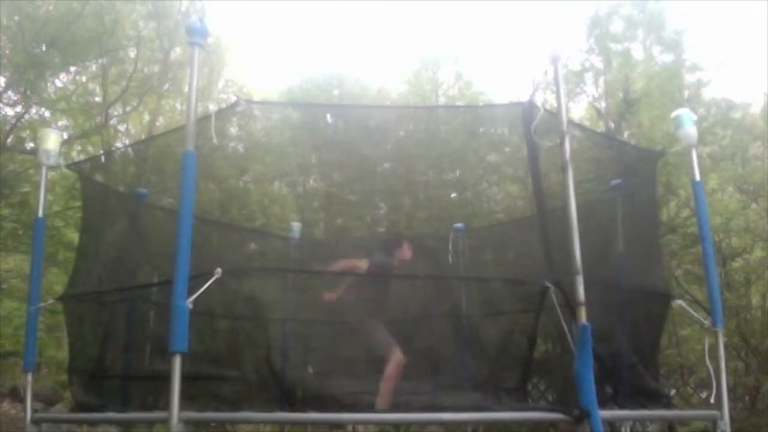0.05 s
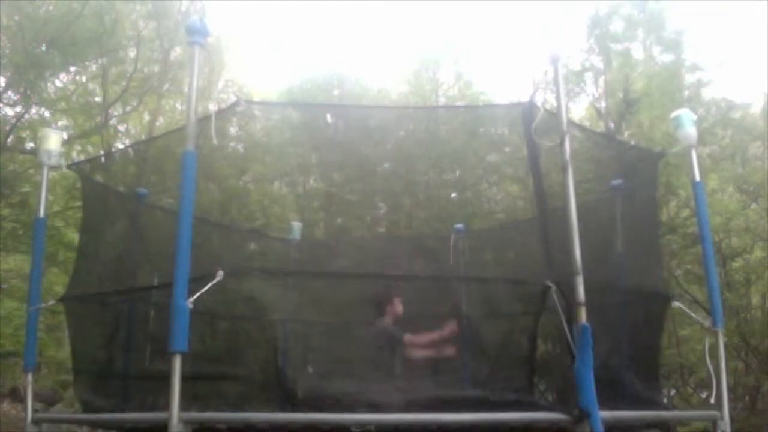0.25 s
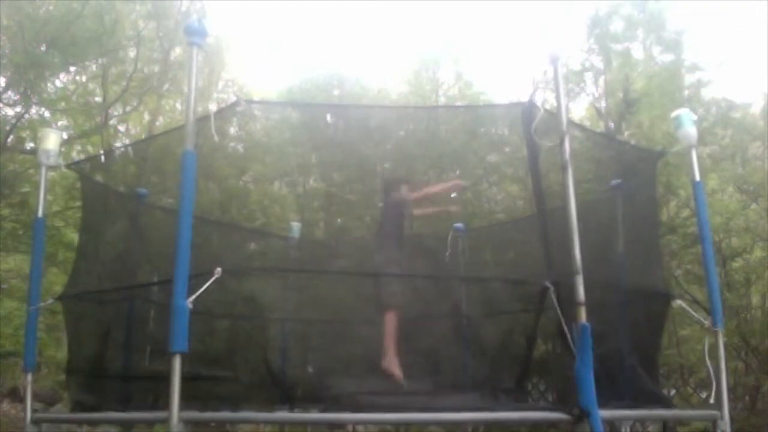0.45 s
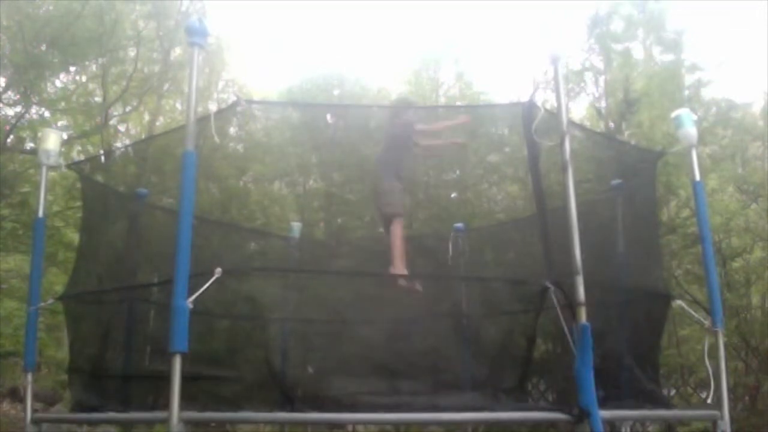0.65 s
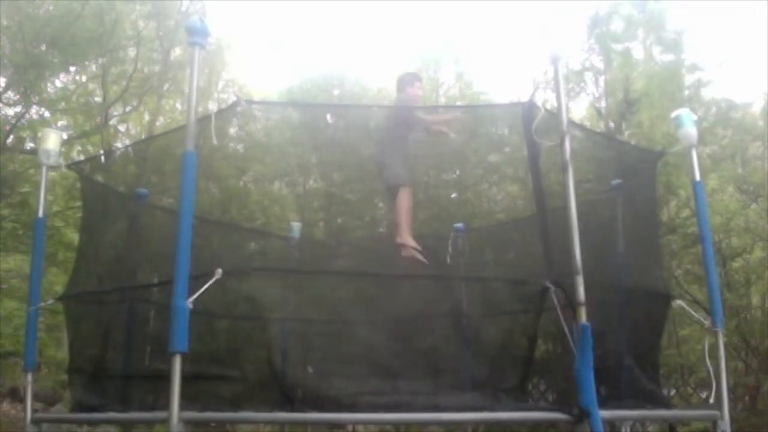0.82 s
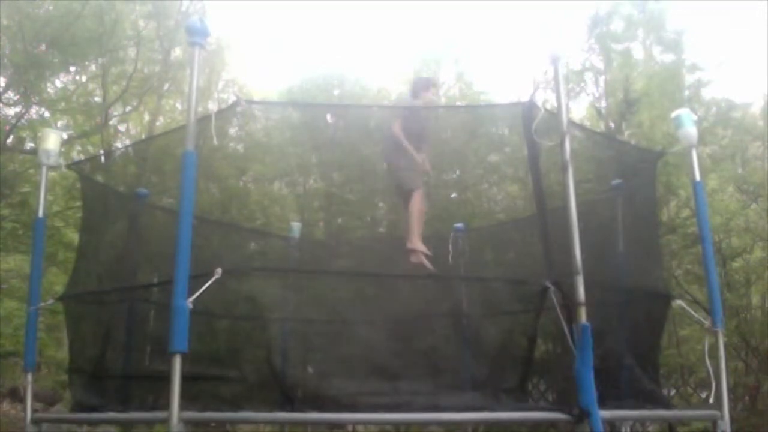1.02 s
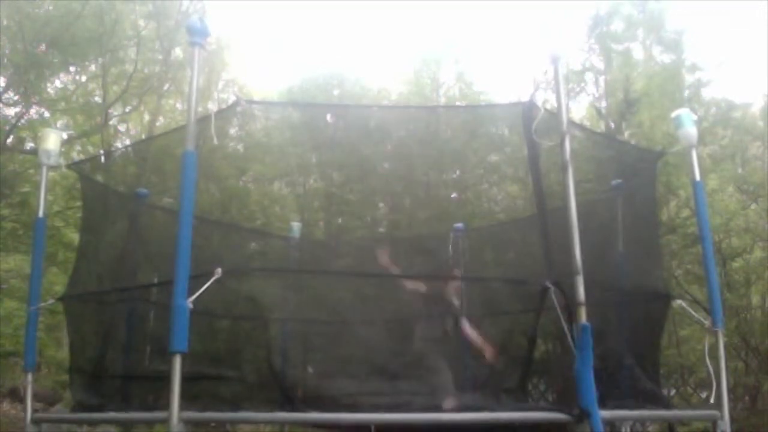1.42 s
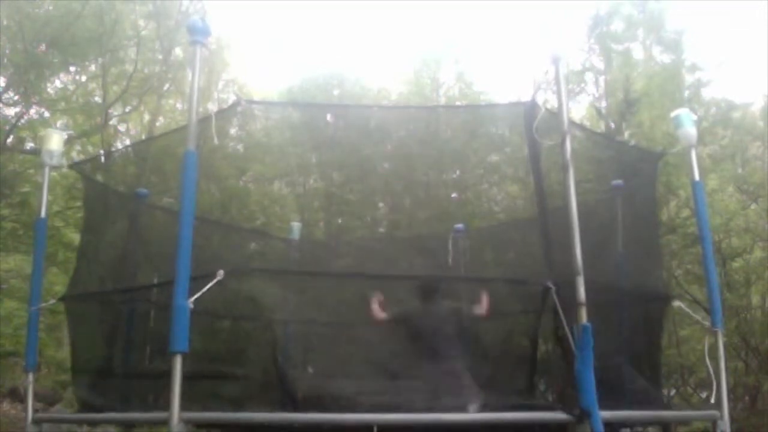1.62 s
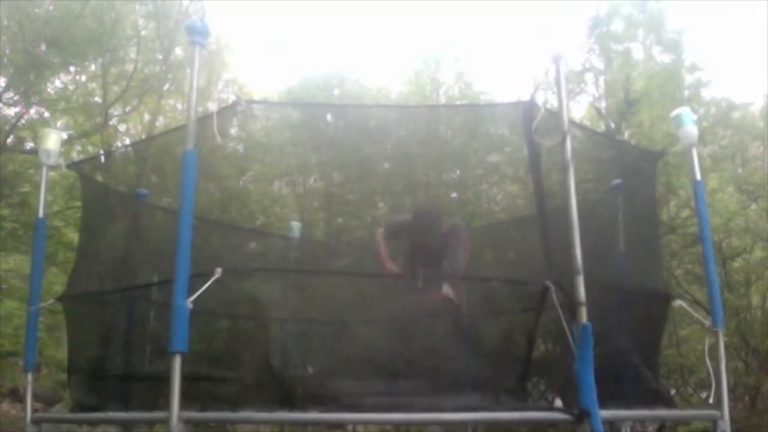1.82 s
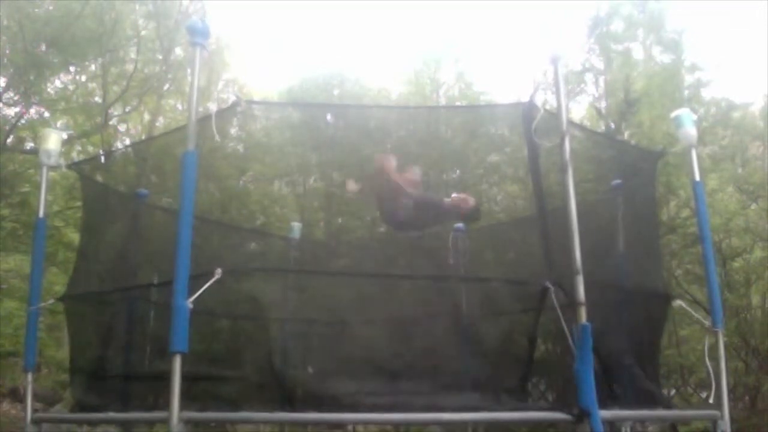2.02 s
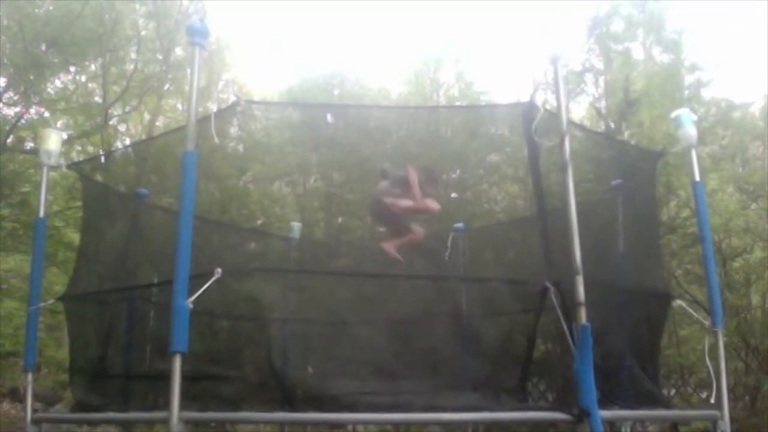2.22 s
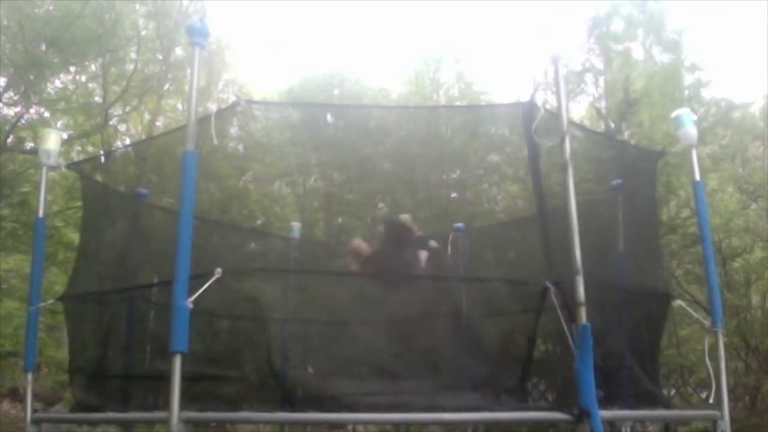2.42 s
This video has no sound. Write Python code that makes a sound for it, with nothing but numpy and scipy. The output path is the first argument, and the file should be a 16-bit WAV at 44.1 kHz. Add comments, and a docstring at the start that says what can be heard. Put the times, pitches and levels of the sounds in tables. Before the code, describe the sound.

A trampoline bounced on twice, its steel springs creaking over soft thumps and faint birdsong.

```python
"""A garden trampoline, one microphone some metres away; a person bounces twice.
A bird calls faintly over the hush as the first landing thumps the mat and stretches the steel springs,
whose hooks creak, squeak and clack in the frame. Springs and frame ring on during the flight, and the
bird calls again. The second landing comes at 1.5 s; a last rattle and a soft thump follow at 2.1 s."""
import sys
import numpy as np
from scipy import signal
from scipy.fft import rfft, irfft
from scipy.io import wavfile
from scipy.ndimage import uniform_filter1d

SR = 44100
rng = np.random.default_rng(int(sys.argv[2]) if len(sys.argv) > 2 else 0)


def int16_out(signal):
    """Quantize to a 16-bit WAV file."""
    q = np.round(np.clip(np.atleast_2d(signal).T, -1, 1) * 32767)
    wavfile.write(sys.argv[1], SR, q.astype(np.int16))


N = 112454
T = np.arange(N) / SR

# ringing modes of the steel: pitch_hz, level_db
STEEL_MODES = [(1918, 1), (1992, -5), (2235, 0), (2340, -7), (2420, -4), (2654, -5), (2842, -4), (2935, -3),
               (3090, -3), (3305, -1), (3630, -8), (3830, -9), (3930, -7), (4015, -8), (4285, -6),
               (4900, -9), (5640, -7), (7680, -12), (8405, -9), (8488, -9)]
HOOK_COLOUR_DB = 3  # random spread of the hooks' spectra


def spring_creaks():
    """As the springs stretch and recoil, each surge of load sets another group of hooks creaking."""
    # surges of load: peak_s, level_db, rise_s, fall_s, treble_db
    surges = [(.194, -45.5, .001, 0.03, -14), (.247, -33.5, 0.02, 0.045, -7.5),
              (.291, -33.5, 0.025, 0.021, -7.5), (.32, -35, 0.006696, 0.017, -8),
              (.342, -39.5, 0.0088, 0.029, -8), (.381, -36.5, 0.0055, 0.024, -11),
              (.404, -36.5, 0.012, 0.02, -10.5), (0.447, -46, 0.035, 0.022, 0),
              (1.537, -37, 0.01534, 0.022, -10), (1.572, -34, 0.015, 0.019, -6.5),
              (1.629, -36.5, 0.018, 0.026, -5.5), (1.714, -35.5, 0.03, 0.043, -5),
              (1.812, -36, 0.0085, 0.0088, -6.5), (1.822, -36, 0.003, 0.017, -7.5)]
    # body of a slipping hook's sound: frequency_hz, gain_db
    body_spectrum = [(300, -36.5), (700, -18.5), (1400, -15), (1900, -5), (3200, -3), (4200, -5.5),
                     (5500, -21.5), (9000, -49.5)]
    # its fine grit: frequency_hz, gain_db
    grit_spectrum = [(2500, -33.5), (4600, -3), (5600, -2), (6700, -5), (8200, -2), (9200, -4),
                     (10400, -6.5), (11800, -17.5), (13800, -26.5), (15600, -30)]
    out, lead_s = np.zeros(N), .1
    t = T[:SR // 2] - lead_s
    for peak_s, db, rise_s, fall_s, treble_db in surges:
        creak = slipping_hooks(len(t))
        body = amp(-.5) * steady(colour(creak, body_spectrum)) * swell(t, rise_s, fall_s)
        grit = amp(1.5 + treble_db) * steady(colour(creak, grit_spectrum))
        grit *= swell(t, rise_s, 1.48 * fall_s)  # outlasts the body
        onset = np.clip(t / rise_s / 2 + 2, 0, 1)
        add(out, peak_s - lead_s, amp(db) * (body + grit) * onset)
    return out


def slipping_hooks(length, count=4, slips_per_s=120, tick_t60_s=.0025, ring_t60_s=.058):
    """Hooks grip and slip; each has a tick, a short rasp and its own detuned mix of the steel's modes."""
    t, creak = T[:SR // 10], np.zeros(length)
    mode_hz, mode_db = np.transpose(STEEL_MODES)
    ring = dying(t, ring_t60_s)
    for _ in range(count):
        rasp = rng.standard_normal(len(t)) * (dying(t, tick_t60_s) + amp(-7) * ring)
        detune = 1 + .04 * rng.standard_normal()
        modes = np.sin(2 * np.pi * np.outer(mode_hz * detune, t))
        weights = amp(mode_db / 2) * rng.standard_normal(len(mode_db))
        jangle = amp(-16) * unit(weights @ modes) * ring
        creak += convolve(slips(slips_per_s * rng.uniform(.5, 2), length), rasp + jangle)
    hz = np.geomspace(1000, 12000, 30)
    return colour(creak, np.c_[hz, HOOK_COLOUR_DB * rng.standard_normal(len(hz))])


def slips(per_s, length, jitter=.3, spread_db=2.5):
    """Stick and slip: an uneven train of clicks of uneven size."""
    rate = per_s * np.exp(jitter * wander(.008, length))
    turns = np.cumsum(rate) / SR + rng.random()
    clicks = np.diff(np.floor(turns), prepend=0)
    return clicks * amp(spread_db * np.clip(rng.standard_normal(length), -2, 2))


def hook_squeaks(slips_per_s=420, ramp_s=.0036, fade_db=-8):
    """Quick slips of one hook keep a single resonance ringing."""
    # single hooks squeaking: start_s, length_s, pitch_hz, level_db, width_hz
    squeaks = [(.232, 0.038227, 1977, -40, 79.14), (0.282, .025, 3210, -38.5, 150.1),
               (0.448, 0.06677, 7880, -45, 400), (0.486, .055, 3960, -61, 60), (.49, .07, 5642, -61.5, 60),
               (0.503, 0.06034, 7660, -53, 300), (0.627, 0.029103, 8400, -56, 207),
               (1.501, .025, 3430, -50, 120), (1.502, 0.03127, 4195, -50, 202),
               (1.501, 0.04256, 8500, -55.5, 297.4), (1.536, 0.026396, 1963, -39, 150),
               (1.683, .015, 1830, -40, 150.1), (1.713, .035, 1910, -38, 306.3),
               (1.76, 0.03, 9400, -47.5, 401.7), (1.805, 0.02185, 8420, -39, 199.6),
               (2.02, .1, 7100, -63.5, 70.33)]
    out = np.zeros(N)
    for start_s, length_s, hz, db, width_hz in squeaks:
        t = T[:round((length_s + ramp_s) * SR)]
        ring = resonate(slips(slips_per_s, SR // 4), hz, width_hz)
        ring = steady(resonate(ring, hz, 2 * width_hz))[-len(t):]
        gate = np.clip(np.minimum(t, t[-1] - t) / ramp_s, 0, 1)
        add(out, start_s, unit(ring) * gate * amp(db + fade_db * (t / length_s) ** 2))
    return out


def hook_clacks():
    """A slack hook chatters briefly against the frame."""
    # knocks in the frame: peak_s, level_db, rise_s, fall_s, centre_hz, width_octaves
    clacks = [(0.588, -46.5, 0.013, 0.0094, 5520, 0.92), (0.67, -51.5, .004, 0.01, 4968, 1.3),
              (0.894, -56, 0.012, 0.03, 2290, 0.6), (1.565, -46.5, 0.0079, 0.00833, 707, 0.17),
              (1.71, -54, 0.079, 0.055, 760, 1.1), (2.083, -42, 0.013, 0.0068, 2050, 0.98),
              (2.081, -49, 0.0057, 0.0061, 8500, 0.15), (2.106, -40.5, 0.0014, 0.0031, 3670, 0.47),
              (2.131, -38.5, 0.0015, 0.0024, 3500, 0.2223), (2.112, -55.5, 0.06783, 0.028, 3013, 1.2)]
    out, hz = np.zeros(N), np.geomspace(200, 16000, 40)
    for peak_s, db, rise_s, fall_s, centre_hz, octaves in clacks:
        band_db = np.maximum(-4.3 * (np.log2(hz / centre_hz) / octaves) ** 2, -50) - 24 * (hz > 11000)
        noise = rng.standard_normal(N)
        chatter = colour(noise, np.c_[hz, band_db + HOOK_COLOUR_DB * rng.standard_normal(len(hz))])
        out += amp(db) * steady(chatter) * swell(T - peak_s, rise_s, fall_s)
    return out


def steel_ring(metal, t60_s=.28, gain_db=-12.5):
    """Every creak and clack leaves the steel's narrow modes ringing."""
    width_hz = np.log(1000) / np.pi / t60_s
    ring = sum(amp(db) * unit(resonate(metal, hz, width_hz)) for hz, db in STEEL_MODES)
    return amp(gain_db) * np.std(metal) * unit(ring)


def mat_thumps(pitch_hz=102.5, sag=2.35, sag_s=.0018, rise_s=.0027, fall_s=.01):
    """The mat booms for a few cycles, its pitch dropping at once."""
    # feet on the mat: start_s, level_db
    thumps = [(0.128, -45), (.241, -49), (1.455, -52), (1.62, -46.5), (2.115, -55)]
    t, out = T[:SR // 5], np.zeros(N)
    turns = np.cumsum(pitch_hz * (1 + sag * np.exp(-t / sag_s))) / SR
    boom = np.sin(2 * np.pi * turns) * (1 - np.exp(-t / rise_s)) * np.exp(-t / fall_s)
    for start_s, db in thumps:
        add(out, start_s, 2 * amp(db) * boom)
    return out


def coil_shimmer(metal, gain_db=-10.5):
    """The shaken coils and frame shimmer on long after the feet have left."""
    # colour of the coils and frame: frequency_hz, gain_db
    spectrum = [(50, -22.5), (75, -4.5), (130, 2.5), (220, 0), (340, -9), (550, -7.5), (800, -0.5),
                (1400, -2), (2400, -1), (3500, -5), (5000, -12.5), (8500, -13), (11000, -22.5),
                (13000, -40)]
    # their decay: frequency_hz, t60_s
    decay = [(100, 3.2), (800, 4.9), (2000, 2.64), (4000, 2.02), (10000, 1.23)]
    shake = rng.standard_normal(N) * np.sqrt(abs(uniform_filter1d(metal ** 2, size=400)))
    shimmer = colour(convolve(shake, tail(decay)), spectrum)
    return amp(gain_db) * np.std(metal) * unit(shimmer)


def tree_echo(x):
    """The trees scatter a short, diffuse echo back to the microphone."""
    decay = [(300, .16), (3000, .34), (10000, .18)]  # frequency_hz, t60_s
    return convolve(x, tail(decay))


def distant_bird(waver=.055, waver_s=.0015, flutter_db=5):
    """Gliding whistles from far off, rough in pitch and level, echoed by the trees."""
    # calls: start_s, length_s, first_hz, last_hz, level_db
    calls = [(0.112, .09, 3116, 2880, -56.5), (.595, 0.12, 3400, 2673, -49.5),
             (1.19, 0.0507, 3130, 2820, -62), (1.256, 0.071, 3620, 3740, -65.5)]
    out = np.zeros(N)
    for start_s, length_s, first_hz, last_hz, db in calls:
        progress = np.linspace(0, 1, round(length_s * SR))
        glide_hz = first_hz + (last_hz - first_hz) * progress
        hz = glide_hz * (1 + waver * wander(waver_s, len(progress)))
        flutter = amp(flutter_db * np.clip(wander(waver_s, len(progress)), -1, 1))
        whistle = unit(np.sin(2 * np.pi * np.cumsum(hz) / SR) * flutter)
        add(out, start_s, amp(db) * whistle * np.sin(np.pi * progress))
    return out + amp(-2) * tree_echo(out)


def garden_hush(level_db=-59.5):
    """Steady distant garden noise; its level dips and recovers as with a recorder's automatic gain."""
    # colour of the hush: frequency_hz, gain_db
    spectrum = [(25, -34), (52, -13.5), (80, -2), (210, 0.5), (340, -11), (850, -6.5), (1700, -7.5),
                (3600, -18.5), (5000, -26.5), (10000, -36), (15000, -49)]
    # recorder's gain drift: time_s, gain_db
    recorder_gain = [(0, 0), (.75, 2.2), (1.25, -1), (2.1, 1.9)]
    hz = np.fft.rfftfreq(N, 1 / SR)
    noise = irfft(rfft(rng.standard_normal(N)) * amp(read(spectrum, hz)), N)
    return amp(level_db + np.interp(T, *np.transpose(recorder_gain))) * unit(noise)


def amp(db):
    return 10 ** (np.asarray(db) / 20)


def unit(x):
    return x / np.sqrt(np.mean(x ** 2) + 1e-20)


def read(points, hz):
    """Joins (frequency_hz, value) points on a log-frequency axis."""
    point_hz, value = np.transpose(points)
    return np.interp(np.log(hz + 1), np.log(point_hz + 1), value)


def add(mix, start_s, sound):
    part = mix[max(round(start_s * SR), 0):][:len(sound)]
    part += sound[:len(part)]


def convolve(x, response):
    return signal.fftconvolve(x, response)[:len(x)]


def colour(x, points):
    """Causal filter through (frequency_hz, gain_db) points."""
    log_gain = np.log(amp(read(points, abs(np.fft.fftfreq(4096, 1 / SR)))))
    taps = np.fft.ifft(np.exp(np.conj(signal.hilbert(log_gain)))).real
    return convolve(x, taps[:len(taps) // 2])


def resonate(x, hz, width_hz):
    """A resonance of gain 1."""
    carrier = np.exp(2j * np.pi * np.cumsum(hz * np.ones(len(x))) / SR)
    pole = np.exp(-np.pi * width_hz / SR)
    return 2 * (carrier * signal.lfilter([1 - pole], [1, -pole], x / carrier + 1e-18)).real


def wander(step_s, length):
    """Glides to a new random value every step_s."""
    values = rng.standard_normal(512)
    return np.interp(T[:length] / step_s, np.arange(len(values)), values)


def steady(x):
    """Evens out the slow level of a texture and keeps its grain."""
    power = uniform_filter1d(uniform_filter1d(x ** 2, size=500), size=500)
    return x / np.sqrt(abs(power) + 1e-3 * power.mean())


def swell(t, rise_s, fall_s):
    """Grows to a peak at t = 0, then dies away."""
    return np.exp(-np.maximum(-t / rise_s, t / fall_s))


def dying(t, t60_s):
    return np.exp(-np.log(1000) * t / t60_s)


def tail(decay):
    """A diffuse tail of energy 1, each band dying at its own speed."""
    hz, t, bands = signal.stft(rng.standard_normal(N), SR, nperseg=256)
    out = signal.istft(bands * amp(-60 * t / read(decay, hz)[:, None]), SR)[1][:N]
    return out / np.linalg.norm(out)


def scene():
    """The trampoline in front, the trees and the garden behind, in mono."""
    metal = spring_creaks() + hook_clacks()
    trampoline = metal + hook_squeaks() + steel_ring(metal) + mat_thumps()
    echo = amp(-9.5) * tree_echo(trampoline)
    return (trampoline + echo + coil_shimmer(metal) + distant_bird() + garden_hush())[None]


def record(dry, notch_hz=11850, notch_width_hz=1970, edge_hz=15650):
    """A notch in the high treble, then the band limit."""
    notched = signal.lfilter(*signal.iirnotch(notch_hz, notch_hz / notch_width_hz, SR), dry)
    lowpass = signal.firwin(511, edge_hz, window=("kaiser", 9), fs=SR)
    return signal.oaconvolve(notched, lowpass[None], "same")


dry = scene()
out = record(dry)
int16_out(out)
```